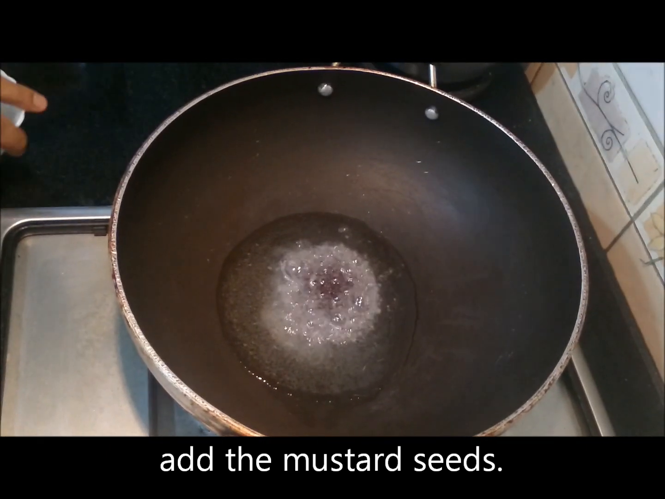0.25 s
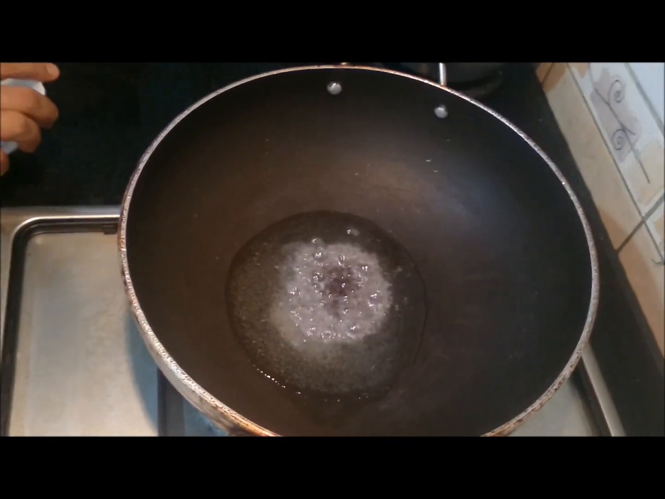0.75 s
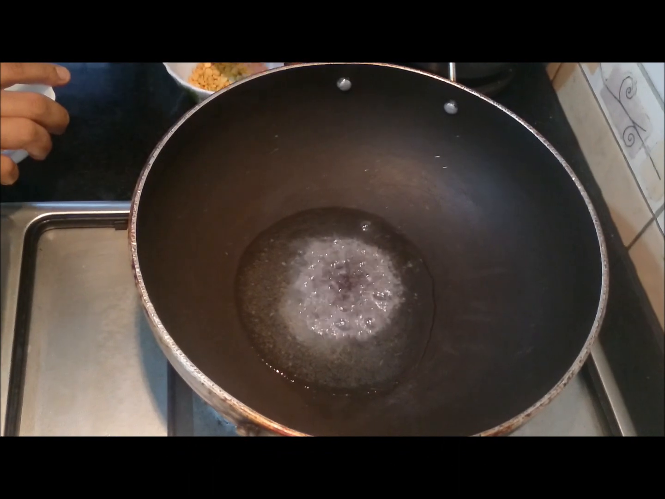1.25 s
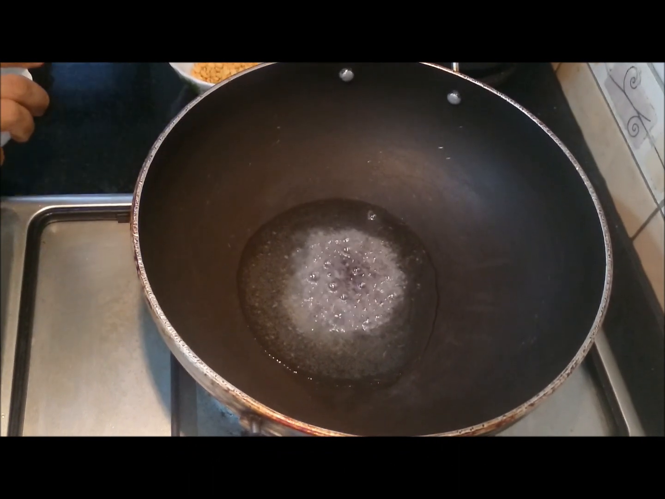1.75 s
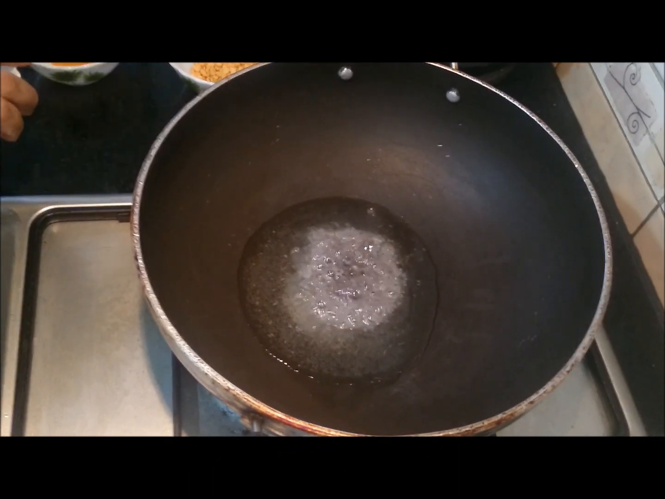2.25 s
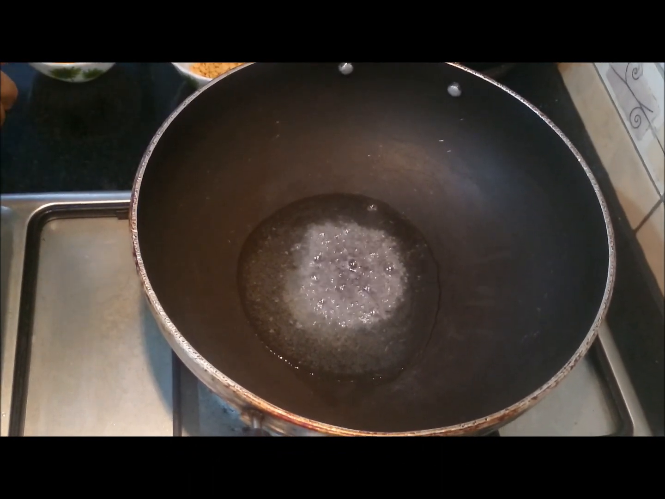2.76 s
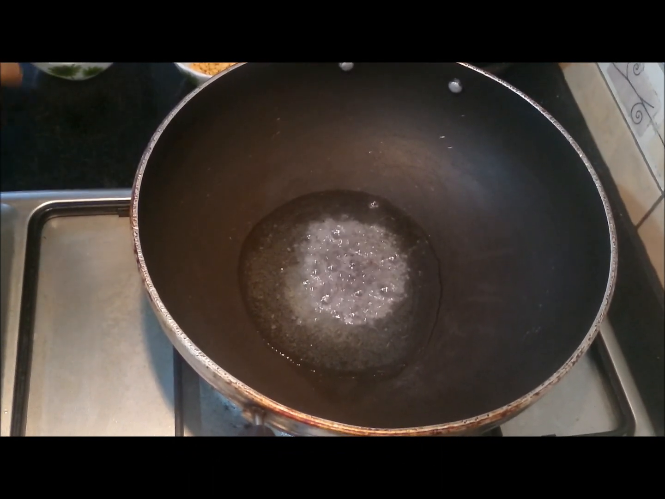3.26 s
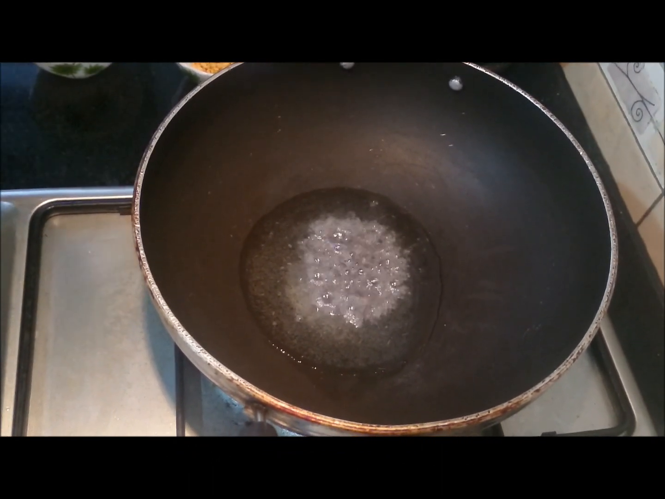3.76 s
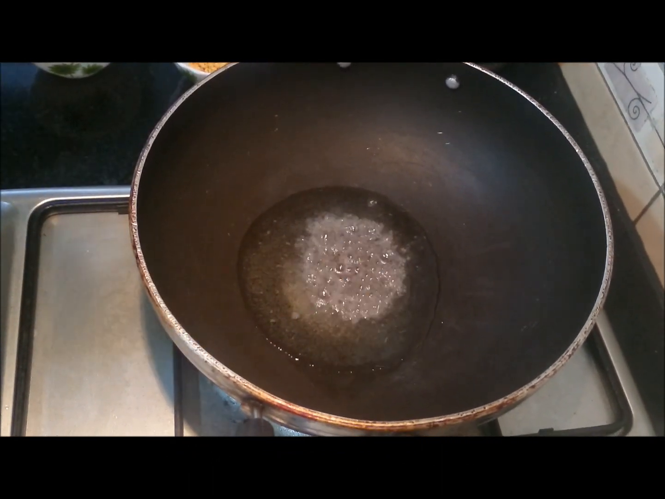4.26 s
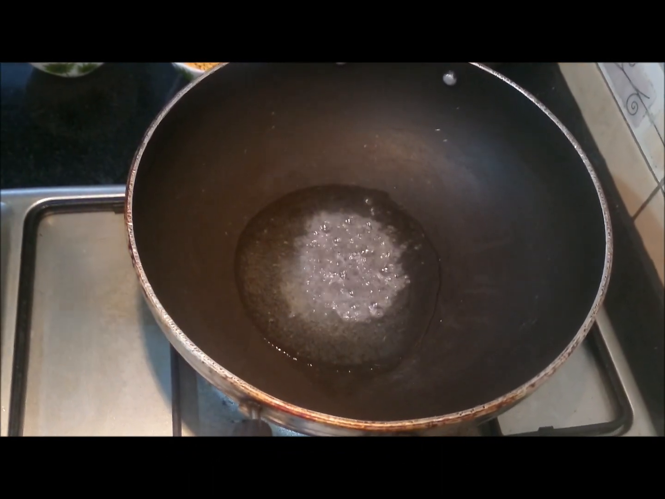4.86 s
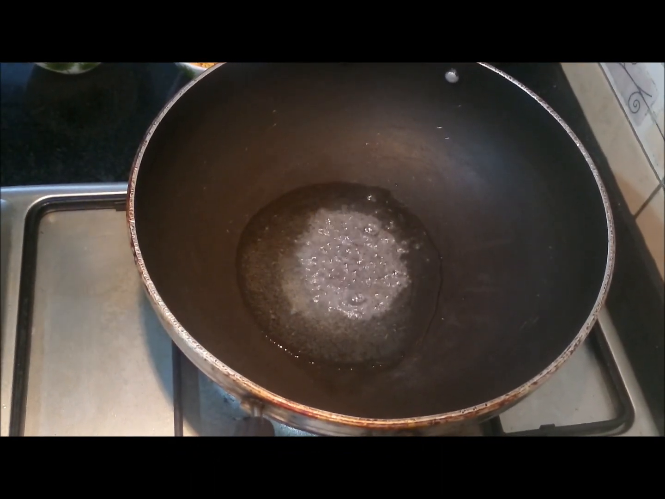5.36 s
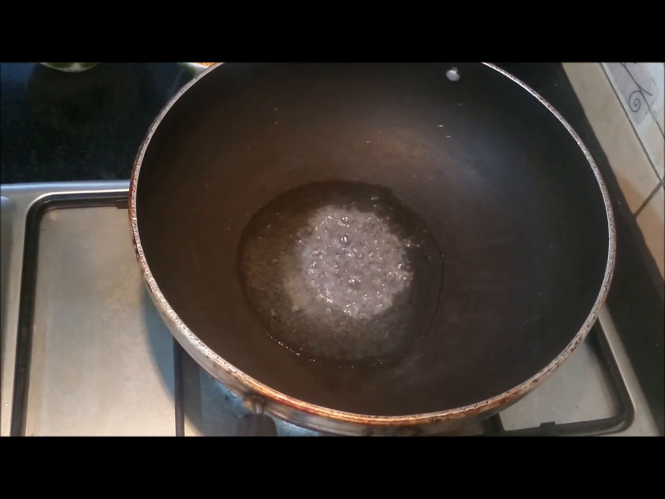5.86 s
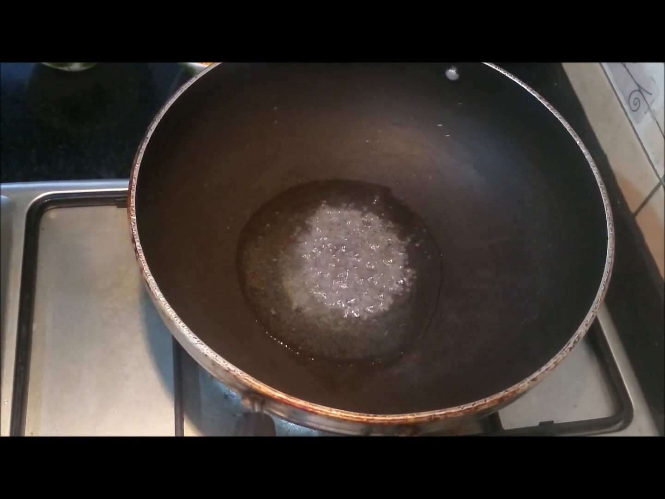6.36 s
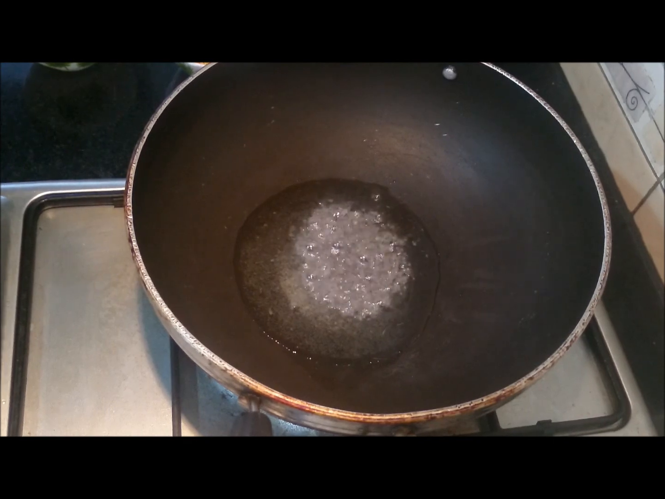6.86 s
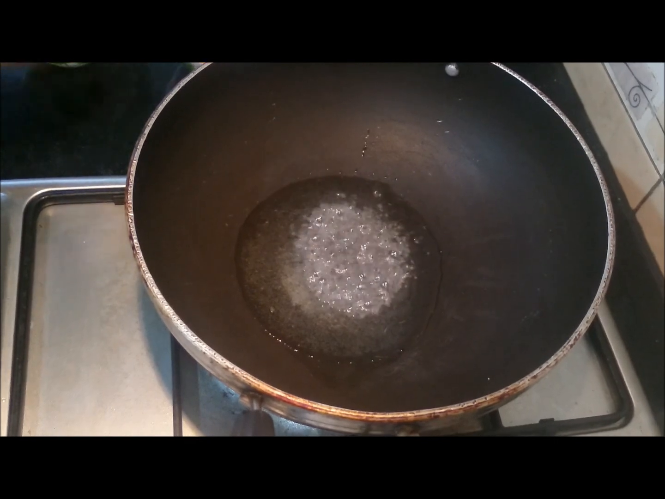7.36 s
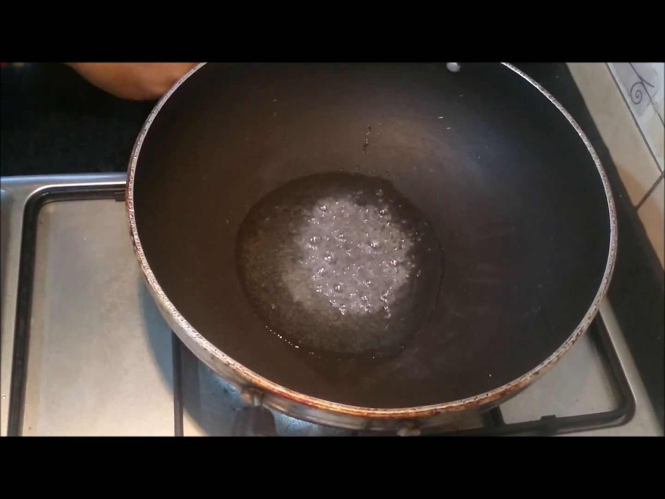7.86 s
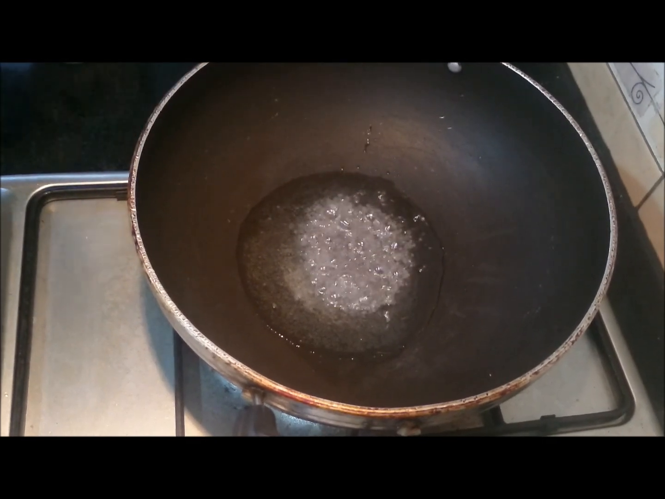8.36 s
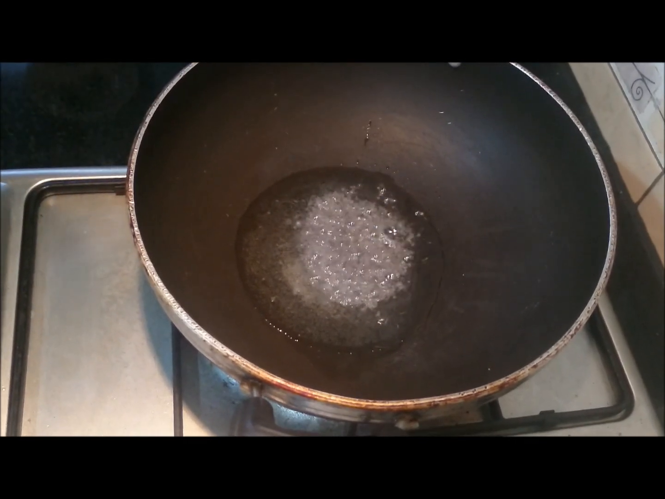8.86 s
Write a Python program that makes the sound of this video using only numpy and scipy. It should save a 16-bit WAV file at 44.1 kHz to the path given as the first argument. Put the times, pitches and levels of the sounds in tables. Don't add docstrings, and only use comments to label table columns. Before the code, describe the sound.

Close view of small seeds frying in a deep metal pan. Fine, bright sizzle and a soft low gas flame roar run throughout. Sharp ringing pops come singly at first while bowls slide and knock on a stone counter. Midway a brief whistling steam jet escapes; then the cracks crowd together, louder and faster, as the sizzle swells. Stereo microphones near the pan pick up short reflections from a tiled kitchen.

```python
import sys
import numpy as np
from scipy import signal
from scipy.fft import rfft, irfft, next_fast_len
from scipy.io import wavfile
from scipy.ndimage import uniform_filter1d, map_coordinates

SR = 44100
rng = np.random.default_rng(int(sys.argv[2]) if len(sys.argv) > 2 else 0)


def invert_db(level):
    return 10 ** (np.asarray(level, dtype=float) / 20)


def wrap_up_sound(samples):
    columns = np.atleast_2d(samples).T
    tamed = np.clip(columns, -1, 1)
    steps = np.round(tamed * 32767).astype(np.int16)
    wavfile.write(sys.argv[1], SR, steps)


N = 402191

# t/s, ring peak level/dB, bubble re ring/dB, crack re ring/dB, pocket f/Hz
HEAVY = [
    (4.3744, -17.5, -6, 3.5, 6560),
    (4.4249, -15.5, -10.5, 7, 5440),
    (5.374, -10, -11, 4, 5320),
]
JET_S, JET_RISE_S, JET_FALL_S = 4.61, 0.083, 0.099
HISS_TOP_HZ = 15850
LOW_POCKET_HZ, LOW_POCKET_DB = 4200, 5


def unit(x):
    return x / np.sqrt(np.mean(x ** 2) + 1e-20)


def along(points, hz):
    f, v = np.transpose(points)
    return np.interp(np.log(hz + 1), np.log(f + 1), v)


def curve(rows):
    s, db = np.transpose(rows)
    return np.interp(np.arange(N) / SR, s, db, left=-120, right=-120)


def wobble(rate_hz):
    knots = rng.standard_normal(int(N * rate_hz / SR) + 4)
    return map_coordinates(knots, [np.arange(N) * rate_hz / SR])


def bump(centre_s, rise_s, fall_s):
    t = np.arange(N) / SR - centre_s
    return np.exp(-(t / np.where(t < 0, rise_s, fall_s)) ** 2)


def filtered(x, response):
    m = next_fast_len(N + SR // 2)
    return irfft(rfft(x, m) * response(np.fft.rfftfreq(m, 1 / SR)), m)[..., :N]


def resonance(f, centre_hz, width_hz):
    return 1j * f * width_hz / (centre_hz ** 2 - f * f + 1j * f * width_hz)


def band_noise(shape, centre_hz, width_hz):
    return unit(filtered(rng.standard_normal(shape), lambda hz: resonance(hz, centre_hz, width_hz) ** 2))


def causal(gain_db):
    cep = irfft(gain_db * np.log(10) / 20)
    half = cep.shape[1] // 2
    cep = np.concatenate([cep[:, :1], 2 * cep[:, 1:half], 0 * cep[:, half:]], axis=1)
    return irfft(np.exp(rfft(cep)))[:, :half]


def pair(left_right, spectrum):
    # f/Hz, correlation [-1..1]
    alike = [(60, 0.11), (150, 0.75), (380, 0.52), (950, 0.26), (2380, -0.1), (5980, 0.76), (15000, 0.18)]

    def mid_side_gain(hz):
        turn = np.arccos(np.clip(along(alike, hz), -1, 1)) / 2
        return invert_db(along(spectrum, hz)) * [np.cos(turn), np.sin(turn)]

    mid, side = filtered(left_right, mid_side_gain)
    return unit(np.array([mid + side, mid - side]))


def chirps(levels_db, pitch_hz, t60, glide):
    t = np.arange(int(SR * t60)) / SR
    phase = 2 * np.pi * pitch_hz[:, None] * (t + glide * t * t / 2)
    return np.sin(phase) * invert_db(levels_db[:, None] - 60 * t / t60) * (1 - np.exp(-t / 0.0011))


def fading(count, t60, rise):
    t = np.arange(int(SR * t60 * .8)) / SR
    shape = invert_db(-60 * t / t60) * (1 - np.exp(-t / rise))
    rows = rng.standard_normal((count, 2, len(t))) * shape
    return rows / np.linalg.norm(rows, axis=2, keepdims=True)


def placed(times, rows):
    where = (times * SR).astype(int)[:, None] + np.arange(rows.shape[1])
    return np.bincount(where.ravel(), rows.ravel(), N + rows.shape[1])[:N]


def bursts():
    # t/s, ring peak level/dB, bubble re ring/dB, crack re ring/dB, steam pocket f/Hz
    deep = [(0.2568, -17.5, -7.5, -12, 4860), (0.7556, -21.5, -11.5, -14, 2440),
            (4.182, -15, -15, -14.5, 4630), (5.327, -8, -20, -22, 5210), (5.691, -19.5, -4.5, -3, 5500),
            (8.861, -20, -3.5, -6.5, 5700), (5.9606, -22.5, -4, -29, 5380), (5.979, -18, -12, -8, 5550),
            (6.4531, -19.5, 0.5, -39, 4550), (6.574, -14, -19, -21.5, 4930),
            (7.2256, -13, -13.5, -4.5, 4580), (7.2894, -3.5, -17.5, -5.5, 4193),
            (7.614, -22, -6, -12, 2670), (7.983, -27, -20, -18, 5230), (6.152, -13.5, -15.5, 1, 5400),
            (8.1478, -22, -11, -9, 3950), (8.192, -19.5, -5, -11, 5750), (8.2201, -16.5, -4.5, -12, 5470),
            (8.734, -17.5, -1, -20, 4500), (8.7748, -16, -6, -14, 5060), (8.8984, -13.5, -24, -28, 4930)]
    # t/s, ring peak level/dB, bubble re ring/dB, crack re ring/dB, steam pocket f/Hz
    loud = [(6.876, -21, -3, -6.5, 5100), (1.193, -6, -17.5, -21.5, 5350), (2.2844, -10, -16, -10, 6100),
            (3.5169, -17, -4, 0, 5070), (3.5881, -18, -10, 5.5, 5800), (3.8156, -13.5, -4.5, 0, 5690),
            (5.1584, -5, -21, -17, 5170), (5.7254, -12, -22, -17, 4830), (6.039, -6, -8.5, -21, 5330),
            (6.13, -10.5, -12, -10.5, 3210), (4.378, -24, -20, 12, 6000), (8.1285, -15, 0, -0.5, 3870),
            (6.2097, -10, -10, -3.5, 5650), (7.0508, -10, -16, -8, 5740), (7.444, -12, -19, -9.5, 5350),
            (7.551, -10.5, -13.5, -7.5, 5820), (7.644, -6.5, -13.5, -13.5, 4690),
            (7.652, -9, -7.5, -7.5, 5130), (7.891, -12, -6, -12.5, 5430), (7.9426, -10.5, -9, -19, 5300),
            (8.587, -13.5, -12.5, 1, 4960), (8.6508, -12, -6.5, -5, 5450), (8.6529, -5.5, -15.5, -11, 4370),
            (8.7887, -23, -11, -8, 5760), (8.7842, -4.5, -14.5, -7.5, 6130), (8.8251, -14, -10.5, -5, 5300),
            (5.678, -13.5, -12.5, 0.5, 5360), (8.9381, -10, -10, -10, 3830)]
    # t/s, ring peak level/dB, crack re ring/dB, steam pocket f/Hz
    wet = [(.004, -33.5, -27, 2570), (7.535, -34.5, -25, 2520), (.1367, -33.5, -7, 2280),
           (1.236, -40, 4.5, 5250), (1.9796, -22.5, -13, 4820), (3.4186, -30.5, -25, 4600),
           (3.4705, -37, -22, 2630), (3.6908, -18.5, -5, 5160), (3.722, -19.5, -27, 4620),
           (3.8793, -31, -8, 3820), (3.9194, -33.5, -11, 5530), (4.2662, -29.5, -28, 5440),
           (4.391, -24.5, 3, 2490), (4.5977, -22, -8, 5740), (5.2126, -20, -15, 3080),
           (5.2778, -22.5, -8, 3960), (6.2571, -15, -19, 4980), (6.6403, -22, 4.5, 5300),
           (6.736, -22.5, -7, 4400), (6.9793, -25.5, -8, 5170), (7.1751, -26.5, -25, 5740),
           (7.6993, -16.5, -28, 4320), (7.726, -22.5, -26, 5130), (7.78, -22, -6, 5030),
           (8.0012, -24, 0, 5700), (8.2848, -34.5, -1, 7660), (8.3923, -28.5, -17, 3620),
           (8.4771, -31, -8, 5200), (8.7665, -17, -9, 5100), (8.9845, -24, -9, 2600), (9.008, -17, 0, 5950),
           (9.0854, -26, -22, 4120)]
    # t/s, ring peak level/dB, crack re ring/dB, steam pocket f/Hz
    dry_husks = [(.2374, -21.5, -29, 4640), (.9058, -31, -6, 7900), (.965, -24, -17, 5060),
                 (1.4765, -30, -31, 5250), (1.5655, -23.5, -23, 4590), (2.368, -15.5, -21, 5050),
                 (2.3977, -26.5, -9, 4840), (2.5585, -32, -2.5, 5300), (2.8963, -25, -4.5, 5200),
                 (3.1942, -31, -1, 5760), (4.4468, -19, -7.5, 6400), (4.8629, -26.5, 3, 5100),
                 (5.0063, -25.5, 5, 5100), (5.1108, -19, -10.5, 6450), (5.1403, -32, -27, 5640),
                 (5.405, -24, -2, 5740), (5.5887, -27, -19, 3860), (6.5515, -31, -34, 5600),
                 (6.7622, -24.5, -2.5, 5330), (7.4648, -18.5, -18, 5040), (7.476, -12.5, -31, 5500),
                 (7.801, -22, 6.5, 7200), (8.3493, -23, -7, 6700), (8.3577, -15.5, -11, 4120),
                 (8.3739, -20.5, -8, 5240), (8.3814, -15, -9, 5940), (8.545, -21, -14, 4130),
                 (8.5714, -20, -19, 5450), (8.6188, -13.5, -34, 4240), (8.755, -13.5, -15, 6570)]
    # t/s, ring peak level/dB, crack re ring/dB, steam pocket f/Hz
    ticks = [(0.46, -36, -7, 5300), (0.83, -36, -12, 4800), (1.7799, -31.5, -20, 5800),
             (2.815, -48, 11, 5800), (3.375, -36, -20, 2500), (2.9885, -30, -20, 4300),
             (3.9, -27, -20, 6600), (4.967, -30, -13, 5000), (5.0477, -37, -18, 5200),
             (5.9074, -38, -9, 5200), (7.4555, -37, 15, 13000), (7.2605, -48, 4, 12000),
             (7.2302, -22, 5.5, 6500), (7.0173, -24, -10.5, 7200), (6.48, -34, -20, 4500),
             (8.113, -30, -12, 4650), (8.311, -43.5, 8.5, 8200), (2.2855, -20, 2, 8700),
             (7.3, -37, 9, 12400), (7.788, -14, -16, 5100)]
    small = []
    for rows, bubble_db in ((wet, -3.5), (dry_husks, -16), (ticks, -14)):
        small += [(s, db, bubble_db, crack, hz) for s, db, crack, hz in rows]
    s, db, bubble, crack, pocket_hz = np.transpose(HEAVY + deep + loud + small)
    kind_db = np.repeat([-4.5, -2.5, -12], [len(HEAVY), len(deep), len(loud + small)])
    thud = kind_db + 0.28 * crack + 0.72 * bubble
    return s, db, thud, bubble, crack, pocket_hz


def burst_colour(hz, db, thud, bubble, crack, pocket_hz):
    # f/Hz, level re its part/dB
    part_colour = [(60, -34), (500, -8.5), (1400, 8), (2300, -2), (3500, 11.5), (4500, 1.5), (5400, 3),
                   (6500, -0.5), (7800, 2), (9600, -2.5), (11000, -3.5), (13000, 0), (16000, -13.5)]
    knots_hz, knots_db = np.transpose(part_colour)
    low_db = LOW_POCKET_DB * (pocket_hz < LOW_POCKET_HZ)[:, None]
    parts = np.repeat([thud, bubble, 0 * db, crack], [3, 2, 3, 5], axis=0).T + knots_db
    parts[:, [4, 5, 7]] += 0.27 * np.minimum(crack + 8, 0)[:, None]
    parts[:, 5:8] -= low_db
    parts[:, -3:] += 1.06 * np.minimum(crack + 4, 0)[:, None]
    colour = np.array([along(np.transpose([knots_hz, p]), hz) for p in parts]) + db[:, None]
    colour += (8 + low_db) * np.exp(-((hz - pocket_hz[:, None]) / 400) ** 2)
    colour += 8 * np.exp(-((hz - 2373) / 360) ** 2)
    husk = uniform_filter1d(rng.standard_normal(colour.shape), size=12, axis=1)
    colour += 1.1 * unit(husk)
    colour[:len(HEAVY)] += 16 / (1 + (hz / 506) ** 2)
    return colour


def puffs(crack, wall_s, wall_db):
    puff = fading(len(crack), t60=.009, rise=.0003)
    t = np.arange(puff.shape[2]) / SR
    swell_s = 0.00019 * invert_db(-.6 * np.minimum(crack, 0))[:, None, None]
    puff *= 1 - np.exp(-t / swell_s)
    puff /= np.linalg.norm(puff, axis=2, keepdims=True)
    puff = 0.43 * puff[:, :1] + 1.785 * puff
    puff[:, :, 2] += 1.09 * invert_db(0.5 * np.minimum(crack, 4))[:, None]
    late = int(wall_s * SR)
    direct = np.pad(puff, [(0, 0), (0, 0), (0, late)])
    return direct + invert_db(wall_db) * np.pad(puff, [(0, 0), (0, 0), (late, 0)])


def falling_drops(count):
    drops = fading(count, t60=.06, rise=.003)
    lumps = np.repeat(rng.standard_normal((count, 1, 200)), 48, axis=2)[..., :drops.shape[2]]
    return drops * invert_db(1 + 3 * lumps)


def gulps():
    # t/s, level/dB, f/Hz
    big_bubbles = [(.2571, -11.5, 2330), (0.7587, -23, 2380), (4.3748, -18, 780), (4.425, -24, 605),
                   (4.425, -30, 1250), (7.288, -20, 1250), (5.374, -23, 553), (5.374, -14, 1900),
                   (5.327, -29, 1000), (5.374, -11.5, 1080), (5.213, -19, 2670), (6.452, -13.5, 2160),
                   (6.876, -20, 2400), (2.2848, -7, 8350), (2.285, -16, 5300), (8.787, -17, 3600),
                   (8.825, -22, 3000), (5.979, -12, 2090), (6.038, -8, 2260), (6.2565, -7, 2400),
                   (7.226, -34, 1300), (7.288, -21, 860), (7.4457, -14, 2370), (7.653, -31, 1490),
                   (8.617, -20, 2200), (8.732, -27, 1390), (8.861, -4.5, 2600)]
    s, db, hz = np.transpose(big_bubbles)
    return placed(s, chirps(db, hz, t60=0.0086, glide=50))


def pips():
    # t/s, level/dB, f/Hz
    snaps = [(.3524, -41, 5200), (.4833, -38, 5940), (.481, -45, 7600), (.5726, -42, 5640),
             (.6774, -54, 8000), (1.3653, -39.5, 5440), (1.5254, -45, 5800), (1.5439, -45, 9150),
             (1.6284, -49, 7600), (2.0724, -48, 5670), (2.16, -47, 4900), (2.2498, -42, 5470),
             (2.612, -41, 7660), (2.7003, -47, 8500), (2.7312, -44, 7500), (2.802, -45, 6800),
             (2.8295, -42, 7600), (2.8769, -40, 7440), (3.2934, -45, 8000), (3.9564, -48, 8000),
             (4.3605, -36, 5500), (4.6684, -39, 5620), (5.8262, -39.5, 4870), (7.0104, -35, 5430),
             (8.0444, -51, 5060), (8.1474, -34, 7200), (8.3024, -35, 7490), (8.5214, -44, 9800),
             (5.406, -29, 6160), (5.279, -29, 5430), (6.131, -25, 5300), (7.176, -36, 5680)]
    s, db, hz = np.transpose(snaps)
    return placed(s, chirps(db + 10.5, hz, t60=0.014, glide=0))


def pops():
    # f/Hz, level/dB
    kitchen = [(300, -31), (1500, -10), (3000, -4.5), (5400, -4.5), (9000, -10.5), (16000, -14.5)]
    # f/Hz, left lead [rad]
    lead = [(300, 0), (900, .6), (1700, 1.6), (3600, 1.6), (4700, 0), (16000, 0)]
    wall_s, wall_db = 0.0037, -11.5
    s, db, thud, bubble, crack, pocket_hz = bursts()
    sings_db = -0.1 * np.minimum(crack + 8, 0)
    hz = np.fft.rfftfreq(1024, 1 / SR)
    colour = burst_colour(hz, db - sings_db, thud, bubble, crack, pocket_hz)
    puff = puffs(crack, wall_s, wall_db)
    drops = falling_drops(len(s))
    echo = fading(len(s), t60=0.36, rise=0.0022)

    near = causal(colour + 12)[:, None]
    loss_db = np.where(pocket_hz < LOW_POCKET_HZ, 1.5, 0.5)[:, None]
    tail = colour + sings_db[:, None] - loss_db * np.exp(-((hz - pocket_hz[:, None]) / 500) ** 2)
    tail -= 20 * (hz > HISS_TOP_HZ)
    room = along(kitchen, hz)
    wet = causal(tail + 12 + room * 0.066)[:, None]
    far = causal(tail + 18 + room - 0.5 * np.exp(-((hz - 5300) / 390) ** 2))[:, None]

    song_db = np.where(pocket_hz < 4000, db + bubble - 9.0, db + 1.2 * sings_db) - 4.0
    glide = np.clip(5000 - pocket_hz, 0, 1500)[:, None] / 40
    song = chirps(song_db, pocket_hz * .96, t60=0.016, glide=glide)
    out = (placed(s, song) + invert_db(wall_db) * placed(s + wall_s, song)) * np.ones((2, 1))
    out += gulps() + pips()

    def size(v):
        return np.linalg.norm(v, axis=2, keepdims=True)

    for noise, response in ((puff, near), (drops, wet), (echo, far)):
        rows = signal.fftconvolve(noise, response, axes=2)
        rows *= size(noise) * size(response) / size(rows)
        out += [placed(s, rows[:, 0]), placed(s, rows[:, 1])]
    return filtered(out, lambda f: np.exp(.5j * along(lead, f) * np.array([[1], [-1]])))


def bubbling():
    # t/s, fizz level/dB
    heat_db = [(0, -51.5), (.3, -53.5), (.8, -56), (2.5, -56), (4.2, -56.5), (5.6, -54.5), (6.5, -53),
               (7.3, -51.5), (8.2, -49), (9.12, -47.5)]
    s, db, _, _, crack, _ = bursts()
    t = np.arange(SR // 2) / SR
    settle = invert_db(-120 * t / 0.45) * (1 - np.exp(-t / 0.017))

    def stir(level_db):
        return np.abs(signal.fftconvolve(placed(s, invert_db(2 * level_db)[:, None]), settle)[:N])

    heat = invert_db(2 * curve(heat_db))
    vent = bump(JET_S, JET_RISE_S, JET_FALL_S)
    fizz = heat + stir(db - 34.5) + invert_db(2 * -47.5) * vent
    hiss = heat * invert_db(2 * -3) + stir(db + crack - 26) + invert_db(2 * -44) * vent
    return 10 * np.log10([fizz, hiss])


def sizzle():
    # f/Hz, density level/dB
    fizz_colour = [(1180, -17.5), (2000, -12.5), (2440, -5.5), (2880, -6), (3940, -5), (5490, 4.5),
                   (7120, -8), (8190, -13), (9920, -17.5), (10900, -20.5), (13800, -17), (14900, -27),
                   (16000, -12)]
    fizz_db, hiss_db = bubbling()
    flicker = invert_db(1.6 * wobble(250) + .9 * wobble(12))
    noise = pair(flicker * rng.standard_normal((2, N)), fizz_colour)
    noise = filtered(noise, lambda hz: hz < HISS_TOP_HZ)
    low = filtered(noise, lambda hz: 1 / (1 + (hz / 7300) ** 12))
    draw = rng.random((900, 4))
    s = draw[:, 0] * (N - 1) / SR
    size_db = fizz_db[(s * SR).astype(int)] + 1.5 - 2.5 * np.log(draw[:, 1] + .03)
    crackle = chirps(size_db, 4000 * 1.6 ** draw[:, 2], t60=.004, glide=0)
    side = invert_db(8.1 * (draw[:, 3:] + 1.0))
    crackles = invert_db(10) * np.array([placed(s, crackle * side), placed(s, crackle / side)])
    return invert_db(fizz_db + 4.0) * unit(low) + invert_db(hiss_db) * unit(noise - low) + crackles


def flame():
    # f/Hz, density level/dB
    flame_colour = [(12, -3.5), (20, -16.5), (33, -16), (98, -13), (149, -17), (174, -21), (220, -19.5),
                    (360, -28.5), (513, -23.5), (703, -21), (850, -11.5), (1130, -26.5), (1240, -23.5),
                    (1430, -26), (2200, -46), (2860, -74), (4840, -120)]
    # t/s, length/s, level/dB
    handling = [
        (0.452, 0.11, -54),
        (0.77, 0.043, -47.5),
        (2.937, 0.029, -49),
        (4.42, 0.046, -52),
        (4.616, 0.034, -46.5),
        (7.467, 0.1, -54),
        (7.653, 0.034, -40),
    ]
    noise = pair(rng.standard_normal((2, N)), flame_colour)
    low = filtered(noise, lambda hz: 1 / (1 + (hz / 160) ** 6))
    deep = unit(filtered(low, lambda hz: 1 / (1 + (hz / 70) ** 4)))
    bumps = sum(invert_db(db) * bump(s, length_s, length_s) for s, length_s, db in handling) * deep
    hum = invert_db(1.5 + 0.73 * wobble(3.13)) * band_noise(N, 91.1, 19.0) + invert_db(-12.5) * band_noise(N, 242.5, 26)
    hum *= invert_db(-66 - 0.1 * np.arange(N) / SR)
    roar = invert_db(-53.5 + 0.28 * wobble(3.08)) * (noise - low)
    rumble = invert_db(-59.5 - wobble(4.9)) * unit(low)
    return hum + roar + rumble + bumps


def draught():
    return invert_db(-55) * band_noise(N, 7.6, 7.6)


def bowls():
    # f/Hz, width/Hz, level/dB
    counter = [(516, 110, -6.5), (910, 340, -1.5), (1370, 360, 3), (1720, 570, -0.5), (2300, 2600, -9)]
    # t/s, peak level/dB, f/Hz
    knocks = [(.83, -55, 1370), (.859, -42, 1390), (.9055, -42, 1420), (.957, -40, 1440),
              (1.022, -41, 1410), (1.282, -51, 1540), (3.173, -39, 1270), (3.2, -36, 1680),
              (3.245, -30.5, 2570), (3.25, -34, 925), (3.272, -34, 1570), (.368, -36.5, 1400),
              (0.988, -28.5, 1335), (1.134, -27.5, 1560), (1.31, -37, 1370), (1.791, -45, 930),
              (1.826, -32, 910), (1.931, -33, 1830), (2.782, -34, 980), (2.92, -38, 1140),
              (3.18, -30.5, 1420), (3.245, -27.5, 1680), (3.417, -34, 1460)]
    # t/s, f/Hz, level/dB, t60/s
    rings = [
        (3.258, 3740, -46.5, .24),
        (4.45, 3100, -42, .1),
        (3.27, 1570, -42, .25),
        (4.443, 2800, -36, .12),
        (4.518, 2800, -41, .12),
        (4.555, 8050, -36, .15),
    ]
    # start t/s, fastest t/s, stop t/s, level/dB
    slides = [
        (0.8, 0.953, 1.39, -52),
        (1.782, 1.938, 2.17, -58),
        (2.686, 2.857, 3.19, -57.5),
        (3.202, 3.296, 3.39, -55.5),
    ]

    def body(f):
        return sum((-1) ** k * invert_db(db) * resonance(f, c, w) ** 2 for k, (c, w, db) in enumerate(counter))

    drag = 0
    for start_s, fastest_s, stop_s, db in slides:
        ends_db = db - 9.5
        drag = drag + invert_db(curve([(start_s, ends_db), (fastest_s, db), (stop_s, ends_db)]))
    drag = uniform_filter1d(drag * invert_db(6.5 + 3 * wobble(45)), size=400)
    s, db, pitch_hz = np.transpose(knocks)
    rattle = placed(s, invert_db(db[:, None] - 11.5 - 60 * np.arange(SR // 8) / SR / 0.1))
    noise = unit(filtered(rng.standard_normal((2, N)), body))
    knock = placed(s, chirps(db - 6.5, pitch_hz, t60=0.071, glide=0))

    draw = rng.random((1200, 3))
    at = draw[:, 0] * 3.5
    grain_db = 2 - 3 * np.log(draw[:, 1] + 0.032)
    grains = chirps(grain_db, 1400 * 1.66 ** (draw[:, 2] - .5), t60=0.0093, glide=0)
    grit = placed(at, drag[(at * SR).astype(int)][:, None] * grains)
    ring = 0
    for t_s, hz, level_db, t60 in rings:
        ring = ring + placed(np.array([t_s]), chirps(np.array([level_db]), np.array([hz]), t60, glide=0))
    return (drag + rattle) * noise + knock + ring + grit


def jet():
    # f/Hz, width/Hz, level/dB
    whistle = [(8070, 300, -54), (15000, 500, -61)]
    bands = sum(invert_db(db + 3.3 * wobble(40)) * band_noise((2, N), c, w) for c, w, db in whistle)
    return np.sqrt(bump(JET_S, JET_RISE_S, JET_FALL_S)) * bands


def scene():
    return pops() + sizzle() + flame() + draught() + bowls() + jet()


def low_pass(x):
    return signal.sosfilt(signal.butter(12, 16780, fs=SR, output="sos"), x)


def record(dry):
    # f/Hz, left minus right level/dB
    port_colour = [(60, -13.5), (99, -4), (160, 0.5), (270, -4.5), (450, -0.5), (740, -2.5), (1220, -2),
                   (2010, 0.5), (3330, 1.5), (5500, -6), (9080, 17), (15000, 5)]
    sign = np.array([[1], [-1]])
    ports = filtered(dry, lambda hz: invert_db(along(port_colour, hz) / 2 * sign) / (1 + (hz / 16500) ** 90))
    ports = filtered(ports, lambda hz: invert_db(-3.5 * np.exp(-((hz - 11100) / 320) ** 2)))
    return low_pass(np.clip(ports, -1.1, 1.1))


dry = scene()
out = record(dry)
wrap_up_sound(out)
```